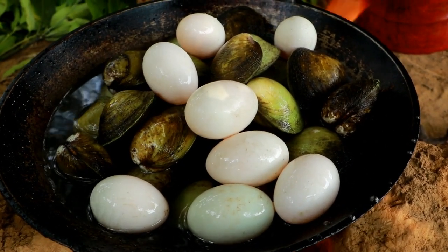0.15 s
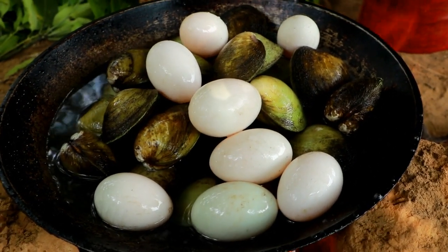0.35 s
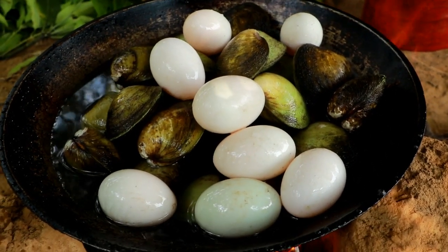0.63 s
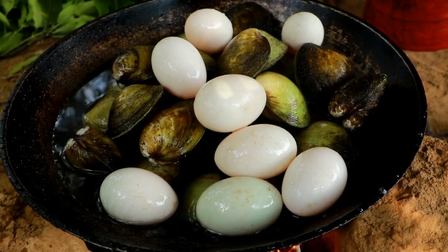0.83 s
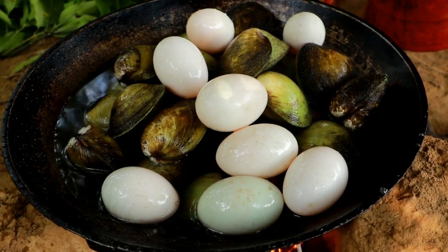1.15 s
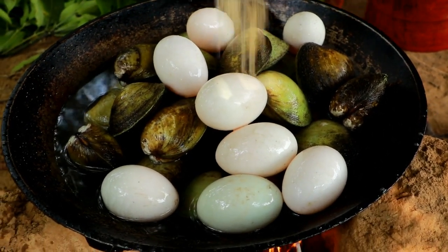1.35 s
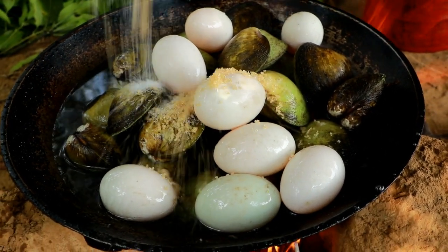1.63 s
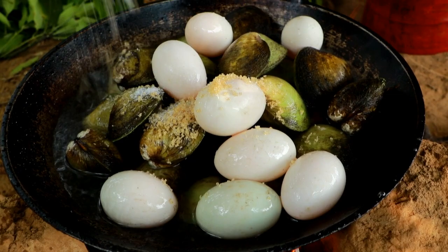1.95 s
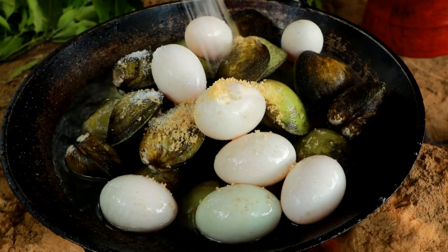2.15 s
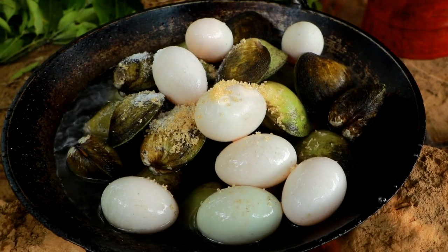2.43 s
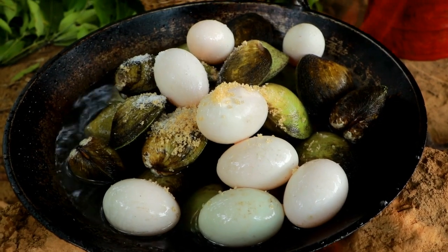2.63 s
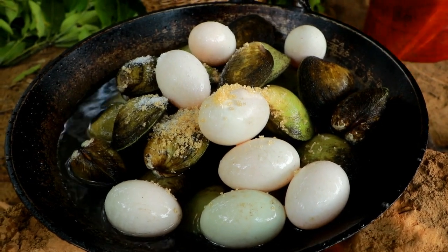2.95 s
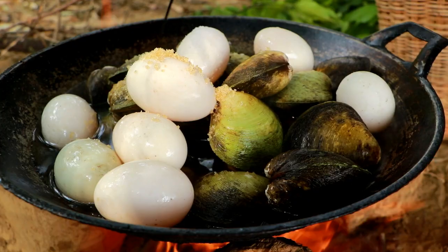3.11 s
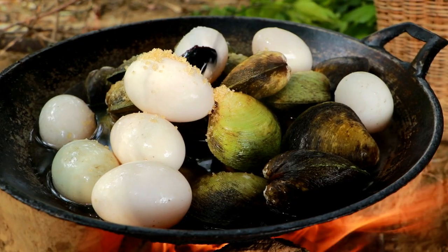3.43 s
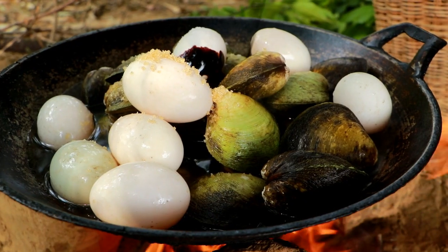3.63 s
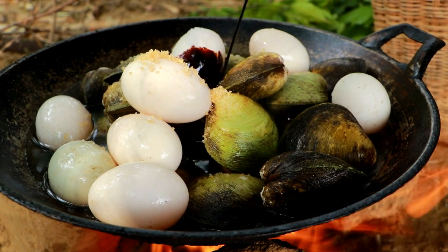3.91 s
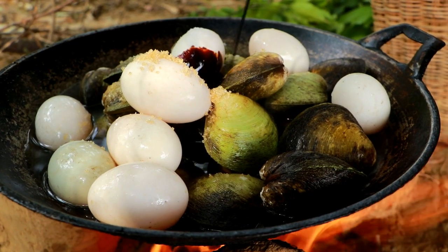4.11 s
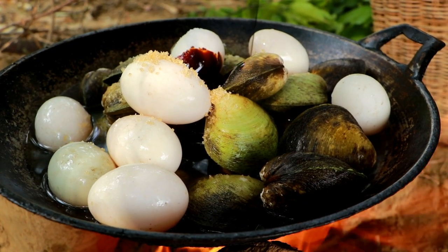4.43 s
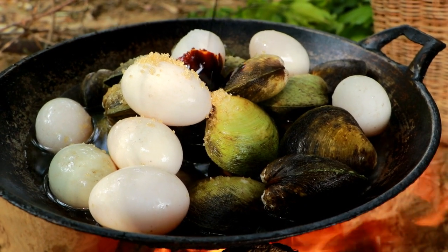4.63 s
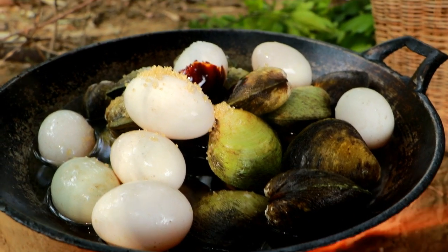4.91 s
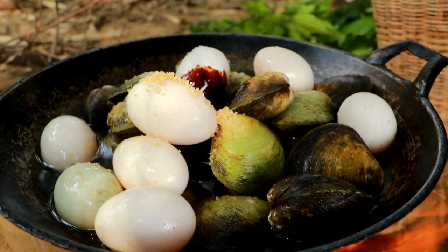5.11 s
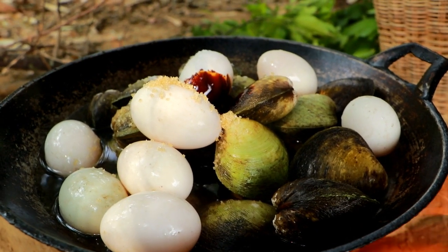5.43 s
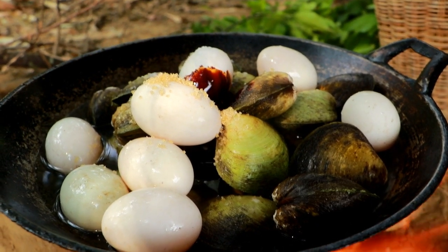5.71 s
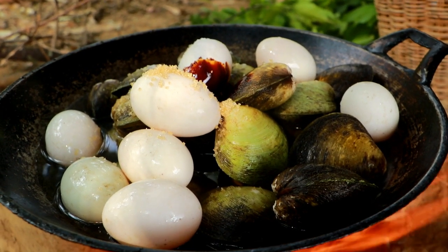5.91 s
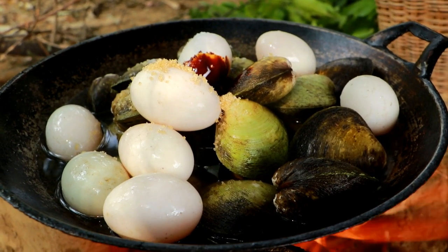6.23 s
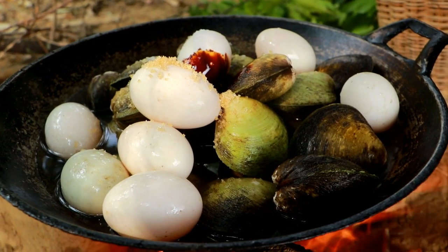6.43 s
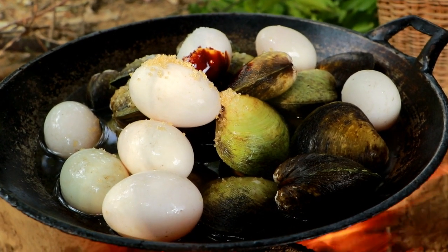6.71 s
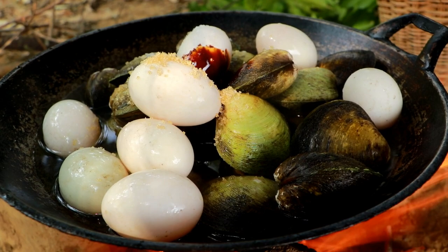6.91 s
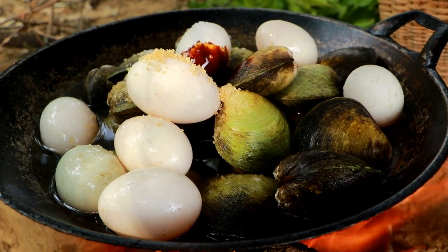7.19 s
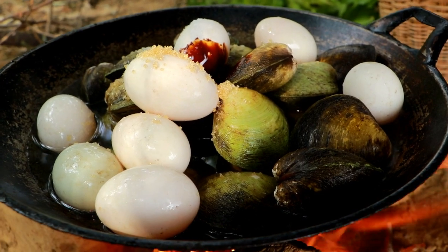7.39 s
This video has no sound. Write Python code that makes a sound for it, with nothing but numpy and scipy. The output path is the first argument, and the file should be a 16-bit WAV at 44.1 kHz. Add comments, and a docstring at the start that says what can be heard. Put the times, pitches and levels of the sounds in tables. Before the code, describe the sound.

Water sizzles and spits loudly in an iron wok, then cuts to a quieter sizzle beside a knife chopping crisp food on a wooden board.

```python
"""Wok and chopping board by a wood fire

Outdoors, water sizzles and spits in an iron wok, first close to the microphone, then cut to farther off.
Noise grains make the sizzle and sharp snaps the spits; shaped noise makes the flames and crackles.
Beside it a knife chops something crisp on a wooden board: noise crunches, then struck modes ring.
Gliding sines make a steam squeal, sauce plops and a far bird; a bright woody knock rings once.
Loud chops overload the recorder: they clip, and its limiter ducks everything for a moment."""
import sys
import numpy as np
from scipy import signal
from scipy.fft import rfft, irfft
from scipy.io import wavfile
from scipy.ndimage import map_coordinates

SR = 44100
rng = np.random.default_rng(int(sys.argv[2]) if len(sys.argv) > 2 else 0)


def dump(signal):
    """Clip the signal to [-1, 1] and save it as 16-bit WAV at the path in sys.argv[1]."""
    limited = np.clip(np.atleast_2d(signal).T, -1, 1)
    pcm = np.round(limited * 32767).astype(np.int16)
    wavfile.write(sys.argv[1], SR, pcm)


N = 333396


def amp(db):
    """Decibels to gain."""
    return 10 ** (np.asarray(db) / 20)


def unit(x):
    """x at rms 1."""
    return x / np.sqrt(np.mean(x ** 2) + 1e-20)


def seconds(length):
    """A time axis of the given length in seconds."""
    return np.arange(int(length * SR)) / SR


def wobble(rate):
    """A smooth random curve, rate knots a second."""
    knots = rng.standard_normal(int(N * rate / SR) + 4)
    return map_coordinates(knots, [np.arange(N) * rate / SR])


def add(track, s, sound):
    """Mix a sound into the track at time s."""
    start = max(0, round(s * SR))
    part = track[start:start + len(sound)]
    part += sound[:len(part)]


def coloured(x, points, size=2048):
    """x through a causal (minimum-phase) filter that follows (f/Hz, level/dB) points."""
    hz, db = np.transpose(points)
    log_hz = np.log(np.fft.rfftfreq(size, 1 / SR) + 1)
    gain = amp(np.interp(log_hz, np.log(hz), db))
    cepstrum = irfft(np.log(gain))
    # folding the cepstrum onto positive time gives the minimum phase
    fold = np.r_[1, np.full(size // 2 - 1, 2), np.zeros(size // 2)]
    impulse = irfft(np.exp(rfft(cepstrum * fold)))
    return signal.fftconvolve(x, impulse)[:len(x)]


def grains(count, spread_db):
    """Dense tiny bursts of rms 1, their sizes scattered in dB."""
    sizes = amp(spread_db * np.clip(rng.standard_normal(count), -4, 4))
    return unit(rng.standard_normal(count) * sizes)


def scattered(count, end, top_db, range_db):
    """(t/s, level/dB) rows of events that fall at random before the end."""
    return [(when * end, top_db - range_db * size) for when, size in rng.random((count, 2))]


def ring(modes, t):
    """A struck body's decaying modes; each level varies a little with the spot that is hit."""
    out = 0
    for hz, db, t60 in modes:
        level_db = db + rng.standard_normal() - 60 * t / t60
        out = out + amp(level_db) * np.cos(2 * np.pi * hz * t)
    return out


def swell(t, rise_s, fall_s):
    """An envelope that grows up to t = 0 and dies away after it."""
    return np.exp(-np.maximum(-t / rise_s, t / fall_s))


def whistle(rows, waver):
    """A wavering tone that follows (t/s, f/Hz, level/dB) rows."""
    s, hz, db = np.transpose(rows)
    t = np.arange(N) / SR
    pitch = np.interp(t, s, hz) * (1 + waver * wobble(400))
    sounding = (t > s[0]) * (t < s[-1])
    return amp(np.interp(t, s, db)) * sounding * np.sin(2 * np.pi * np.cumsum(pitch) / SR)


# the iron bowl's resonances, heard close up: f/Hz, width/Hz, level/dB beside the direct sound
WOK = [(1712, 15.6, 10), (3430, 24, 3.5)]


def in_wok(x):
    """The iron bowl adds its narrow resonances."""
    out = x
    for hz, width, db in WOK:
        out = out + amp(db) * signal.lfilter(*signal.iirpeak(hz, hz / width, SR), x)
    return out


# spectrum of the sizzle with the microphone close to the wok: f/Hz, relative level/dB per Hz
NEAR_HISS = [(400, -14.5), (1000, -11.5), (1350, -6), (2200, -6.5), (3200, 1.5), (3800, -2), (5000, 0),
             (6700, -5.5), (8700, -0.5), (10500, -11.5), (13000, -9.5), (16000, -19)]
# spectrum of the sizzle from farther off: f/Hz, relative level/dB per Hz
FAR_HISS = [(400, -7), (1200, -9.5), (1750, 0.5), (2400, -9), (3500, 3.5), (4100, -4), (5000, -3),
            (7000, -7.5), (8800, -4.5), (10700, -14), (13000, -10.5), (16000, -18.5)]
CUT_S = 2.981  # when the sound cuts from close by the wok to farther off
# close up the sizzle slowly dies down, from farther off it is steady (rms dB, dB/s, rms dB)
NEAR_DB, DYING_DB_PER_S, FAR_DB = -27.5, 1.24, -40


def sizzle():
    """Countless vapour bubbles burst as noise grains, in the ringing bowl close up, duller farther off."""
    t = np.arange(N) / SR
    close = unit(coloured(in_wok(grains(N, spread_db=5.0)), NEAR_HISS))
    distant = unit(coloured(grains(N, spread_db=5.0), FAR_HISS))
    nearness = np.clip((CUT_S - t) / 0.0012, 0, 1)  # a 1.2 ms crossfade
    surge = amp(0.1 * wobble(4.5) + 1.07 * wobble(60))
    near_part = nearness * amp(NEAR_DB - DYING_DB_PER_S * t) * close
    far_part = (1 - nearness) * amp(FAR_DB) * distant
    return surge * (near_part + far_part)


# spectrum of the flames: f/Hz, relative level/dB per Hz
FLAMES = [(20, -2.5), (70, -4.5), (140, -1), (260, -6), (500, -13), (900, -9.5), (2000, -52)]


def flames():
    """Flames flutter as low noise of randomly varying level."""
    flutter = amp(-52.5 + 4.6 * wobble(30) + 0.61 * wobble(2.98))
    return flutter * unit(coloured(rng.standard_normal(N), FLAMES))


def bubble(hz, t60):
    """A bubble rings briefly from hz, rising in pitch as it surfaces."""
    t = seconds(t60)
    envelope = amp(-60 * t / t60) * (1 - np.exp(-t / 0.00017))
    return envelope * np.sin(2 * np.pi * hz * (t + 7.8 * t ** 2))


# clear bubbles in the sauce: t/s, level/dB before the soft onset, starting f/Hz
PLOPS = [(3.613, -30.5, 746), (3.631, -21, 2060), (3.703, -23.5, 1700), (4.124, -21, 830),
         (5.059, -21, 965)]


def sauce():
    """Bubbles ring: a few clear plops over random low blips of the simmering broth."""
    out = np.zeros(N)
    for s, db, hz in PLOPS:
        add(out, s, amp(db) * bubble(hz, t60=0.028))
    for when, pitch, size in rng.random((190, 3)):
        blip = bubble(115 * 3.5 ** pitch, t60=0.027)
        add(out, when * N / SR, amp(-28 - 35 * size) * blip)
    return out


# the loudest droplets bursting on hot iron: t/s, peak level/dB, body level/dB in the droplet's spectrum
SPITS = [(0.0428, -4.5, -27), (0.0957, -0.5, -27), (0.3159, -3.5, -22.5), (0.381, -7.5, -32),
         (0.4635, -7, -39), (1.1962, -7, -25), (1.223, -3.5, -28), (1.3547, -1.5, -28), (1.365, -4, -31),
         (1.3717, -4, -29), (1.3911, -1.5, -25.5), (1.5614, -2, -26), (1.5845, -7, -31), (1.6943, -12, -24),
         (1.815, -1, -33), (1.9996, -2.5, -15), (2.018, -1, -27), (2.1261, -9, -14.5), (2.2213, -3.5, -48),
         (2.2994, 1, -25), (2.4317, -1.5, -31), (2.4883, 1, -24.5), (2.5416, -2.5, -38), (2.71, -5.5, -37)]
# spectrum of a droplet's snap above its body: f/Hz, relative level/dB per Hz
DROPLET = [(3300, -27.5), (6500, -24), (9000, -21), (11000, -31), (14000, -28), (17000, -54.5)]
# the lesser ones come at random: loudest peak, range below it, body
SPRAY_DB, SPRAY_RANGE_DB, SPRAY_BODY_DB = -11.5, 9, -31.5


def spits():
    """A droplet bursts in one sharp snap amid a little spray; they are heard only close up."""
    out, t = np.zeros(N), seconds(0.015)
    spray = scattered(count=75, end=CUT_S, top_db=SPRAY_DB, range_db=SPRAY_RANGE_DB)
    lesser = [(s, db, SPRAY_BODY_DB) for s, db in spray]
    for s, db, body_db in list(SPITS) + lesser:
        burst = amp(-20.5 - 60 * t / 0.014) * grains(len(t), spread_db=0.5)
        burst[SR // 1000] = 1  # the snap itself, 1 ms in
        body = [(150, body_db - 18), (1500, body_db)]
        snap = coloured(burst, body + list(DROPLET))
        add(out, s, amp(db) * snap / np.abs(snap).max())
    return out


# steam squealing out from under a shell: t/s, f/Hz before the waver, level/dB
SQUEAL = [(.07, 1192, -60), (.095, 1246, -30), (.14, 1130, -46), (.19, 1274, -35), (.24, 1310, -38)]


def squeal():
    """Escaping steam makes a short, wavering tone."""
    return whistle(SQUEAL, waver=0.066)


# spectrum of a crackle's snaps: f/Hz, relative level/dB per Hz
SNAP = [(200, -8), (1000, 6), (2800, 5), (4200, 9), (5600, 6), (9000, 4), (13000, -2), (16000, -3)]
# spectrum of a crackle's woody body and of pieces dragged over the board: f/Hz, relative level/dB per Hz
RASP = [(60, -36), (150, -7), (380, 3.5), (540, -14.5), (800, 7), (1050, -4), (1400, -12), (3000, -12),
        (9000, -19), (16000, -45)]
# crisp crackles: embers, and at 0.787 s a bright crunch before the blade's knock: t/s, level/dB, t60/s
CRACKLES = [(0.787, -17.5, 0.24), (3.418, -20, 0.075), (4.083, -26.5, 0.19), (5.9117, -20, 0.023),
            (6.17, -31, 0.082), (7.0005, -19.5, 0.0096), (7.057, -24.5, 0.05), (7.0962, -20, 0.015),
            (7.1013, -12.5, 0.013)]
CRACKLE_BODY_DB = -13  # woody body relative to the snaps


def crackles():
    """Embers, and one bright crunch, break in decaying grains over a woody noise body."""
    out, t = np.zeros(N), seconds(0.31)
    for s, db, t60 in CRACKLES:
        snaps = unit(coloured(grains(len(t), spread_db=3.5), SNAP))
        body = unit(coloured(rng.standard_normal(len(t)), RASP))
        add(out, s, amp(db - 60 * t / t60) * (snaps + amp(CRACKLE_BODY_DB) * body))
    return out


# below this the board radiates little; the limit climbs with the square of the hardness
# and has doubled at a hardness of THIN_HZ (both Hz)
BASS_LIMIT_HZ, THIN_HZ = 67.3, 2020


def struck(modes, t, hard_hz):
    """A blow of peak 1: a soft, long contact leaves high modes asleep, a hard one is thin in the bass."""
    contact = t * np.exp(-2 * np.pi * hard_hz * t)
    blow = signal.fftconvolve(ring(modes, t), contact)[:len(t)]
    bass_hz = min(BASS_LIMIT_HZ * (1 + (hard_hz / THIN_HZ) ** 2), SR / 20)
    blow = signal.sosfilt(signal.butter(1, bass_hz, "high", fs=SR, output="sos"), blow)
    return blow / np.abs(blow).max()


# spectrum of crisp fibres breaking: f/Hz, relative level/dB per Hz
CRISP = [(150, 14), (800, 8.5), (1500, -3), (2400, 8), (3300, -8), (6000, -1.5), (9000, -7.5), (12000, -12),
         (16000, -41)]
# the crunch builds up over a few contact times (1 / hardness) and stops short
CRUNCH_CONTACTS, CRUNCH_RELEASE_S = 1.9, 0.0029


def crunch(t, hard_hz):
    """Breaking fibres swell until the blade lands at t = 0; a soft contact draws this out."""
    fibres = unit(coloured(grains(len(t), spread_db=3), CRISP))
    return swell(t, CRUNCH_CONTACTS / hard_hz, CRUNCH_RELEASE_S) * fibres


# modes of the chopping board, for nudges and chops: f/Hz, relative level/dB, t60/s
BOARD = [(146, -8, 0.016), (354, -16.5, 0.036), (427, -4.5, 0.022), (674.6, 4, 0.021), (931, -1, 0.018),
         (1312, 9, 0.0062), (1444, -13.5, 0.07), (1894, -4.5, 0.0085), (2272, -14, 0.055),
         (2654, -2.5, 0.0091), (3210, -3.5, 0.012)]
# modes of the blade's dull push through the food, for both: f/Hz, relative level/dB, t60/s
THUD = [(163, -11, 0.086), (314, 5, 0.0195), (416, 5.5, 0.014)]
# the blade knocks pieces aside and drags them:
# t/s, knock level/dB, scrape level/dB, drag decay/s, crunch level/dB
NUDGES = [(0.809, -30, -21, 0.013, -17), (5.592, -17.5, -29, 0.006, -49), (5.6493, -6.5, -22.5, 0.018, -42),
          (5.703, -37, -33, 0.15, -20.5), (6.4112, -8.5, -36, 0.005, -25), (6.4292, -5, -23.5, 0.016, -26),
          (6.458, -21, -34, 0.015, -18.5)]
# hardness of the knock, its thud relative to the board, growth time of the scrape
NUDGE_HZ, NUDGE_THUD_DB, SCRAPE_RISE_S = 680, -14, 0.0064


def nudges():
    """The blade knocks softly against pieces, which slip unevenly across the board as fluctuating noise."""
    out, t = np.zeros(N), seconds(0.4)
    lead = .04  # the crunch starts this long before the knock (s)
    slips = unit(amp(3 * wobble(110)) * coloured(rng.standard_normal(N), RASP))
    for s, knock_db, scrape_db, drag_s, crunch_db in NUDGES:
        knock = struck(BOARD, t, NUDGE_HZ) + amp(NUDGE_THUD_DB) * struck(THUD, t, NUDGE_HZ)
        add(out, s, amp(knock_db) * knock)
        add(out, s - lead, amp(crunch_db) * crunch(t - lead, NUDGE_HZ))
        out += amp(scrape_db) * swell(np.arange(N) / SR - s, SCRAPE_RISE_S, drag_s) * slips
    return out


# strokes of the knife, up to about three a second:
# t/s, board's peak level/dB before the limiter, hardness f/Hz, crunch level/dB
CHOPS = [(3.214, -8.5, 520, -19.5), (3.5116, 5.5, 1780, -6), (3.834, -1, 830, -13.5),
         (4.3822, 2.5, 595, -14.5), (4.6823, 11, 1740, -13.5), (5.0219, 7, 910, -13),
         (5.3359, 12, 1800, -17.5), (5.9466, 14, 1560, -12.5), (6.2536, 10, 1210, -9.5),
         (6.5816, 16.5, 4550, -6), (6.8912, 17.5, 5600, -16), (7.1897, 18.5, 4350, -15),
         (7.4958, 7, 740, -25)]
# modes of the steel blade, in part close pairs that beat: f/Hz, level/dB under the stroke, t60/s
BLADE = [(810, -46, 0.34), (875, -43, 0.3), (1523, -26, 0.07), (2287, -45, 0.3), (2410, -50, 0.31)]
BLADE_WAKE_HZ = 2800  # a stroke this hard wakes half the blade's ring, harder ones more
# thud of a gentle stroke, the stroke level it holds up to, and dB of thud lost per dB beyond that
THUD_DB, GENTLE_DB, THUD_LOSS = -6, -2.5, 1.54


def knife():
    """The blade crunches through the food and lands on the board: gentle strokes thud, hard ones crack."""
    out, t = np.zeros(N), seconds(0.3)
    lead = .02  # the crunch starts this long before the landing (s)
    for s, db, hard_hz, crunch_db in CHOPS:
        thud_db = THUD_DB - THUD_LOSS * max(db - GENTLE_DB, 0)
        steel = ring(BLADE, t) / (1 + (BLADE_WAKE_HZ / hard_hz) ** 2)
        landing = amp(db) * (struck(BOARD, t, hard_hz) + steel)
        thud = amp(thud_db) * struck(THUD, t, hard_hz=604)
        add(out, s, landing + thud)
        add(out, s - lead, amp(crunch_db) * crunch(t - lead, hard_hz))
    return out


# calls of the far bird: t/s, level/dB before the open air is added
WHISTLES = [(3.7, -35), (5.881, -40.5)]
# each creeps up, leaps and trails off: t/s from its start, f/Hz before the waver, relative level/dB
WHISTLE = [(0, 3840, -10), (0.025, 4100, 0.5), (0.085, 4510, -2.5), (0.13, 5650, 2), (0.15, 5960, -15),
           (0.25, 6020, -24)]


def bird():
    """Thin upward whistles, wavering tones that follow one shape."""
    return sum(whistle(np.array(WHISTLE) + [s, 0, db], waver=0.0172) for s, db in WHISTLES)


# modes of a bright woody knock: f/Hz, relative level/dB, t60/s
KNOCK_MODES = [(504, -21, 0.081), (665, -6, 0.019), (1107, 0, 0.043), (1170, 1, 0.026), (1670, 10, 0.014),
               (2020, 9.5, 0.017), (3500, -5, 0.067), (5950, 8, 0.0074)]
# when it sounds: t/s, peak level/dB
KNOCKS = [(4.8301, 0.5)]


def woody_knock():
    """A bright woody knock: short decaying modes, coloured towards the lower middle."""
    out, t = np.zeros(N), seconds(0.31)
    for s, db in KNOCKS:
        knock = coloured(ring(KNOCK_MODES, t), [(100, -40), (400, 11.5), (2500, -3.5), (7000, -10), (14000, -16)])
        add(out, s, amp(db) * knock / np.abs(knock).max())
    return out


def outdoors(x, wet_db, t60):
    """Ground and trees add a scatter: a decaying noise tail, fainter for close sources."""
    t = seconds(.6)
    tail = rng.standard_normal(len(t)) * amp(-60 * t / t60) * (1 - np.exp(-t / 0.0037))
    tail = coloured(tail, [(100, -7), (600, -8), (850, -2.5), (1200, -6), (1900, -7.5),
                           (2380, 0), (3200, -16), (6000, -3.5), (12000, -25)])
    return x + amp(wet_db) * signal.fftconvolve(x, tail / np.linalg.norm(tail))[:N]


def scene():
    """Wok, fire and knife close by, the bird among the trees."""
    wok = sizzle() + squeal()
    cooking = flames() + sauce() + spits() + crackles()
    board = nudges() + knife() + woody_knock()
    close = outdoors(cooking + board, wet_db=-29.5, t60=0.35)
    far = outdoors(bird(), wet_db=-4, t60=.55)
    return (wok + close + far)[None]


def limited(x, ceiling_db, attack, release_db):
    """Gain drops on an overload within about attack seconds and climbs back by release_db a second."""
    over = np.maximum(20 * np.log10(np.abs(x) + 1e-9) - ceiling_db, 0)
    ramp = release_db * np.arange(N) / SR
    held = np.maximum.accumulate(over + ramp, axis=-1) - ramp
    keep = np.exp(-1 / (attack * SR))
    reduction_db = signal.lfilter([1 - keep], [1, -keep], held)
    return x * amp(-reduction_db)


TOP_HZ = 16000  # the recorder's upper band limit


def record(dry):
    """The limiter is too slow for the first cycles of a loud chop, which clip; then the band limit."""
    loud = np.clip(limited(dry, ceiling_db=-4.5, attack=0.021, release_db=155), -1, 1)
    return signal.sosfiltfilt(signal.cheby1(12, .05, TOP_HZ, fs=SR, output="sos"), loud)


dry = scene()
out = record(dry)
dump(out)
```